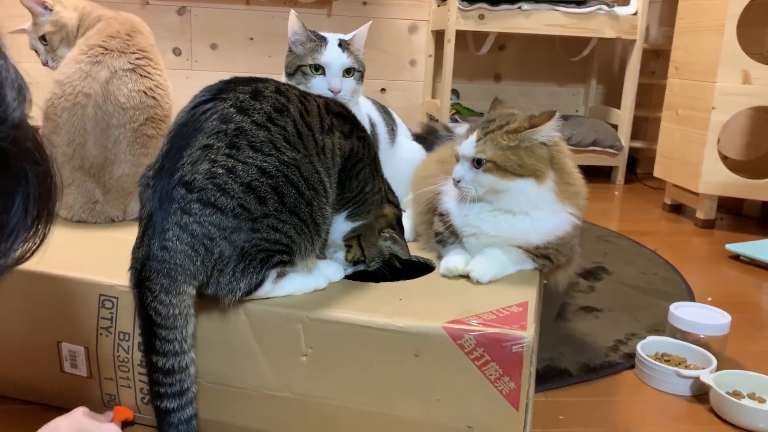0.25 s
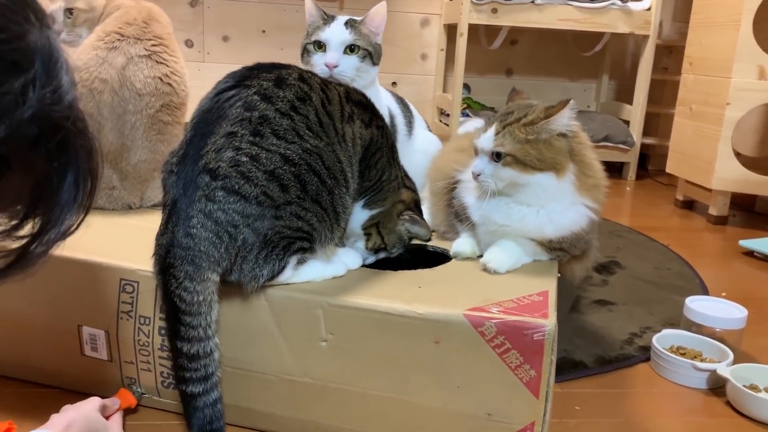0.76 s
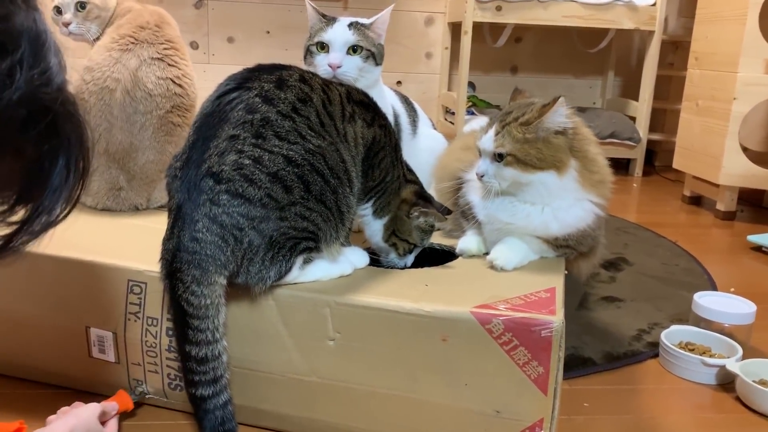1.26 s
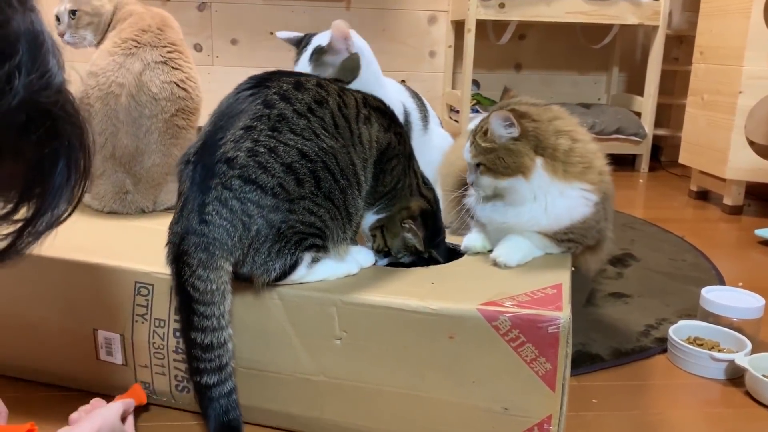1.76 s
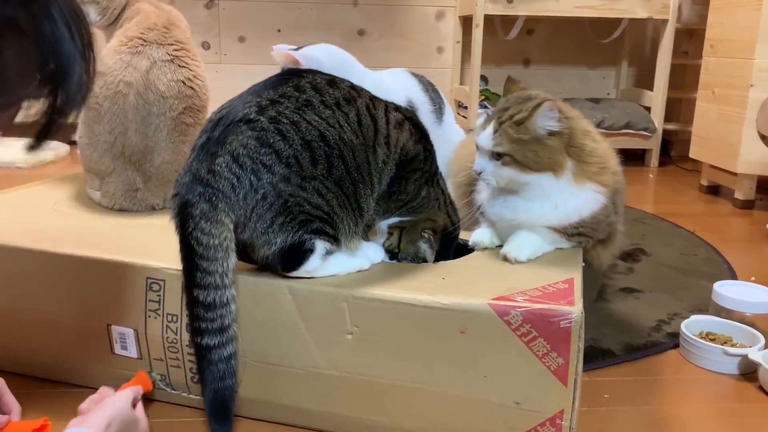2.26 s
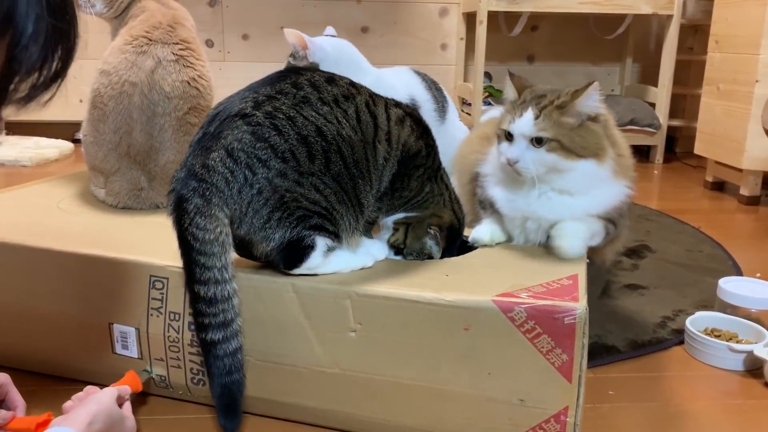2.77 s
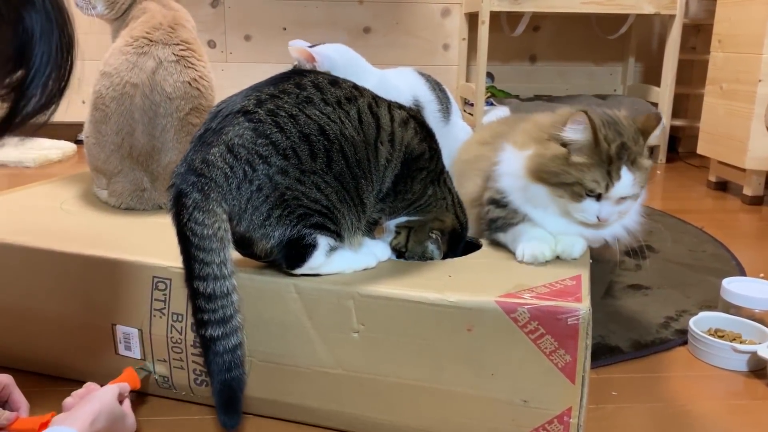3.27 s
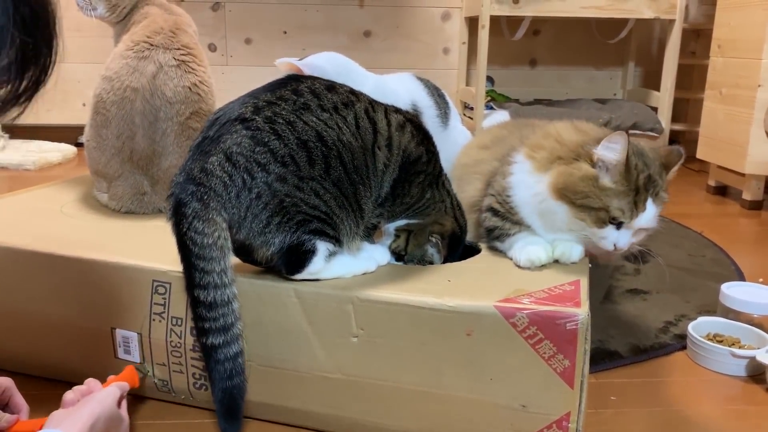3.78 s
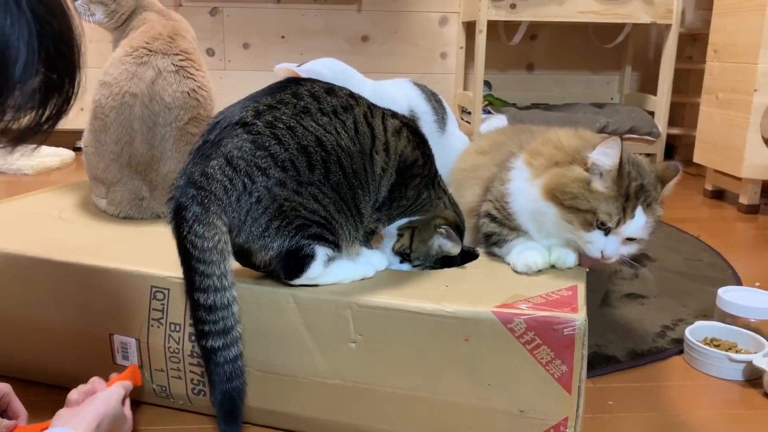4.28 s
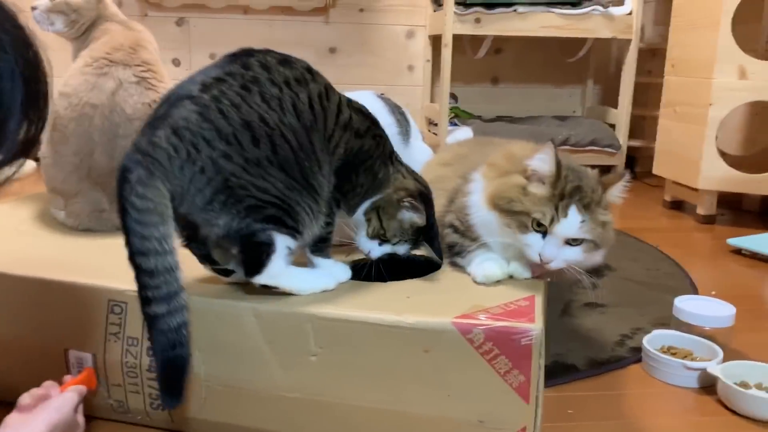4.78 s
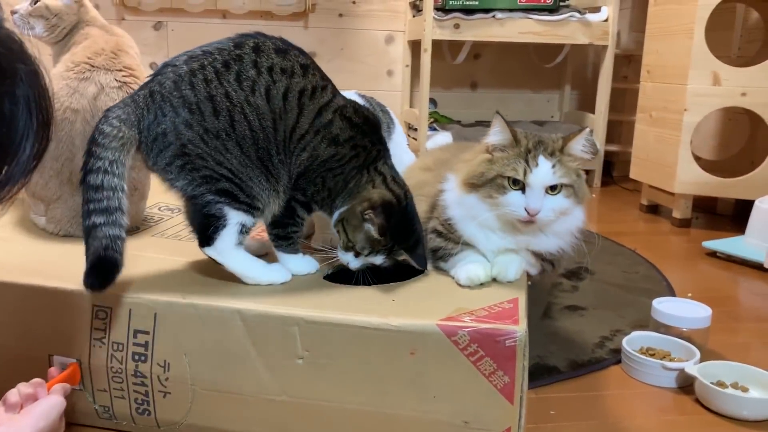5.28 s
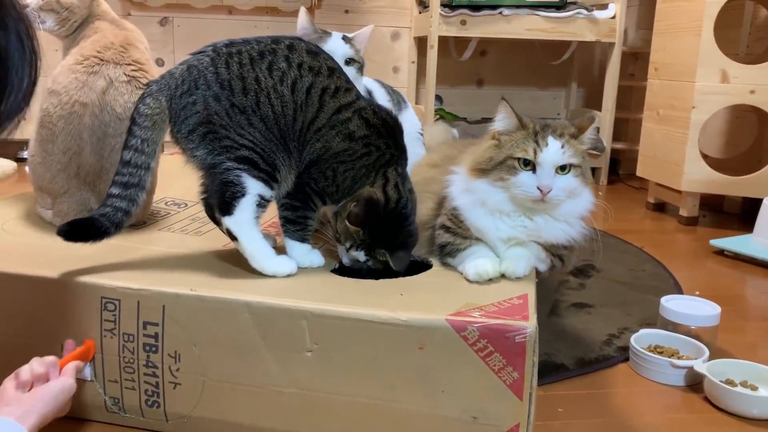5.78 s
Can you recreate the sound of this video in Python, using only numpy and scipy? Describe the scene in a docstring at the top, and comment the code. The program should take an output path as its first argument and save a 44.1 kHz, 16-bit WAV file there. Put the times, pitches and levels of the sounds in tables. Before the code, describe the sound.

A hand works a stick toy against the inside wall of a large cardboard box, several strokes a second. Each stroke gives a hollow drumming scrape, a short buzz over the corrugations, knocks and dry ticks, with low thuds from the flexing panel and a faint tuft hiss. A brief lull comes near one second, then strokes continue to the end. Close stereo microphone, small wooden room, cats silent.

```python
"""A small wooden room, two microphone ports close to a big cardboard box: a hand jerks a stick toy through its hole.
Each stroke drags the end along the inner wall. Slips and corrugations drum the wall's resonances, snags knock it,
shoves boom the panel in two decaying modes; filtered friction noise makes the card rasp and the tuft hiss.
Drumming and rasp reach the left port first, the hiss the right one; the room answers in decaying noise tails."""
import sys
import numpy as np
from scipy import signal
from scipy.fft import rfft, irfft, next_fast_len
from scipy.io import wavfile
from scipy.ndimage import uniform_filter1d

SR = 44100
rng = np.random.default_rng(int(sys.argv[2]) if len(sys.argv) > 2 else 0)


def attenuation_scalar(level_db):
    """Turn a level in dB into a linear amplitude multiplier (20 dB per decade)."""
    decades = np.asarray(level_db, float) / 20
    return 10 ** decades


def file_out(sig):
    """Save sig as 16-bit WAV at sys.argv[1]."""
    # one column per channel
    cols = np.atleast_2d(sig).T
    # limit, then scale
    lim = np.clip(cols, -1, 1)
    pcm = np.round(lim * 32767).astype(np.int16)
    wavfile.write(sys.argv[1], SR, pcm)


N = 266364
STEPS = np.arange(0, N / SR + .004, .001)  # control times [s]


def unit(x):
    """Scaled to rms 1."""
    return x / np.sqrt(np.mean(x ** 2) + 1e-20)


def along(points, hz):
    """Reads (frequency [Hz], value) points on a log frequency axis."""
    f, v = np.transpose(points)
    return np.interp(np.log(hz + 1), np.log(f + 1), v)


def curves(rows):
    """One value per sample for each column after the time."""
    s, *columns = np.transpose(rows)
    return [np.interp(np.arange(N) / SR, s, column) for column in columns]


def per_sample(*controls):
    """Controls given each millisecond, as one value per sample."""
    return curves(np.transpose([STEPS, *controls]))


def filtered(x, response):
    """x times a complex response of frequency."""
    m = next_fast_len(N + SR // 2)
    return irfft(rfft(x, m) * response(np.fft.rfftfreq(m, 1 / SR)), m)[..., :N]


def resonances(modes):
    """Sum of damped modes (Hz, width Hz, dB) in alternating sign, scaled to an rms gain of 1."""
    def response(f):
        h = 0
        for k, (centre, width, db) in enumerate(modes):
            damping = 1j * f * width
            h = h + (-1) ** k * attenuation_scalar(db) * damping / (centre ** 2 - f ** 2 + damping)
        return h / np.sqrt(np.sum(abs(h) ** 2) / len(f))
    return response


def impulses(s, db):
    """One spike per event."""
    return np.bincount(np.round(s * SR).astype(int), attenuation_scalar(db), N)[:N]


def flutter(samples):
    """Random wavering of rms 1, smoothed twice over so many samples."""
    once = uniform_filter1d(rng.standard_normal(N), int(samples))
    return unit(uniform_filter1d(once, int(samples)))


def patchy(x, depth_db):
    """Uneven fibres: random patches of gain over time and frequency."""
    z = signal.stft(x, nperseg=256)[2]
    field = uniform_filter1d(rng.standard_normal(z.shape), size=7, axis=0)
    field = uniform_filter1d(field, size=12, axis=1)
    return signal.istft(z * attenuation_scalar(depth_db * unit(field)), nperseg=256)[1][:N]


def slips(per_s, spread_db, smooth):
    """Stick-slip force of rms 1: random slips of uneven size over a share of smooth rubbing."""
    chance, size, noise = rng.random(N), rng.standard_normal(N), rng.standard_normal(N)
    jerks = unit((chance < per_s / SR) * attenuation_scalar(spread_db * size) * np.sign(noise))
    return unit(jerks + smooth * rng.standard_normal(N))


def ports(x, left_lag_s, lean=((1000, 0),)):
    """One source at both microphone ports, with a delay and a level lean (left minus right) between them."""
    side = np.array([[.5], [-.5]])
    return filtered(x, lambda hz: attenuation_scalar(side * along(lean, hz)) * np.exp(-2j * np.pi * hz * side * left_lag_s))


# gain that shapes noise into the air of the quiet room: (frequency [Hz], relative gain [dB])
AIR_SPECTRUM = [(25, -52), (55, 19.5), (130, 6), (300, -1), (700, -10), (2400, -72), (8000, -82),
                (15600, -54)]


def air():
    """The quiet room: one shared rumble and a little noise of each port's own."""
    noise = rng.standard_normal((3, N))
    both_ports = noise[0] + 0.089 * noise[1:]
    return attenuation_scalar(-47) * unit(filtered(both_ports, lambda hz: attenuation_scalar(along(AIR_SPECTRUM, hz))))


# how fast the small wooden room dies away: (frequency [Hz], 60 dB decay time [s])
ROOM_DECAY = [(100, 0.53), (1000, 0.24), (6000, 0.21), (15000, 0.2)]


def room(x):
    """Each frequency of the answer dies at its own speed; a new noise tail every quarter second."""
    out, step = np.zeros((2, N + 2 * SR)), SR // 4
    delay = 200  # samples before the answer
    for at in range(0, N, step):
        hz, t, z = signal.stft(rng.standard_normal((2, SR // 2)), SR, nperseg=256)
        decay = attenuation_scalar(-60 * t / along(ROOM_DECAY, hz)[:, None])
        tail = signal.istft(z * decay, SR, nperseg=256)[1]
        wet = signal.fftconvolve(x[None, at:at + step], tail / np.linalg.norm(tail[0]), axes=1)
        out[:, at + delay:at + delay + wet.shape[1]] += wet
    return out[:, :N]


# strokes of the toy on the wall, levels before each source's own gain:
# (full contact [s], rise [s], hold [s], drumming [dB], brightness [dB], friction hiss [dB])
STROKE_ROWS = [(0, .02, 0, -13.5, -3.5, -40.5), (0.085, 0.033, 0.05, -18, -1, -36),
               (0.202, 0.022, 0.037, -19, -0.5, -34), (0.368, 0.054, 0.01, -12.5, -1.5, -34.5),
               (0.463, .022, 0.043, -20, -6, -39), (.624, 0.055, 0.042, -20.5, -7, -46),
               (0.781, 0.016, 0.025, -26, -4.5, -47.5), (1.052, 0.028, 0.044, -30.5, -4, -50.5),
               (1.229, 0.017, 0.055, -23, 0.5, -62), (1.28, 0.066, 0.019, -19, -3.5, -39),
               (1.391, 0.032, 0.046, -18.5, -2.5, -41.5), (1.58, 0.077, 0.0098, -16.5, -7.5, -41.5),
               (1.688, 0.011, 0.03, -16, -2.5, -40), (1.843, 0.044, 0.031, -20.5, -7.5, -43.5),
               (1.988, 0.026, 0.0036, -16.5, -2, -37), (2.158, 0.049, .045, -15.5, -3.5, -36),
               (2.3, .035, 0.043, -16, -4, -36), (2.436, .05, .05, -38.5, -2.5, -53),
               (2.533, 0.051, 0.035, -17.5, -13.5, -43), (2.716, .015, 0.12, -23, -9.5, -45.5),
               (3.011, 0.0084, 0.091, -20.5, -11, -43.5), (3.249, 0.052, 0.053, -15, -8.5, -35),
               (3.457, 0.017, .05, -24, -11.5, -45.5), (3.534, .1, 0.043, -17, -13.5, -41),
               (3.79, .045, 0.03, -16, -7.5, -36.5), (4.029, 0.011, 0.0258, -26.5, 2, -33),
               (4.07, 0.038, 0.021, -11.5, -13.5, -31.5), (4.352, 0.044, 0.048, -19.5, -1, -32.5),
               (4.566, .017, 0.014, -21.5, -7, -40.5), (4.594, 0.033, 0.054, -13.5, -3.5, -30),
               (4.874, 0.035, 0.043, -14, -10.5, -40), (5.125, 0.011, .03, -14, -14, -36),
               (5.18, .03, 0.017, -11.5, -13.5, -33.5), (5.438, 0.043, 0.06, -14.5, -13, -36),
               (5.69, .012, .02, -14, -6.5, -37.5), (5.723, 0.039, 0.028, -16.5, -10, -35),
               (5.979, .03, .02, -30.5, -14.5, -51), (6.03, 0.04, 0.026, -13, -15, -37.5)]


def stroke_controls():
    """Drumming, brightness and hiss in dB: strokes rise, hold and fall; the strongest sets the brightness."""
    rise_db, hiss_rise_db, bend = 21.5, 17, 0.98  # climb over one rise time, and its exponent
    drum_fall, settle_fall = 348, 120  # dB per s: first fall, then a slower end
    hiss_fall, rustle_fall = 476, 117  # dB per s: a faint rustle outlasts the hiss
    settle_under_db, rustle_under_db = 16.5, 16
    drum_rest_db, hiss_rest_db = -55, -66.5  # the toy lying still against the card
    s, rise_s, hold_s, drum_db, bright_db, hiss_db = np.transpose(STROKE_ROWS)[:, :, None]
    early = (np.maximum(s - STEPS, 0) / np.maximum(rise_s, .003)) ** bend
    late = np.maximum(STEPS - s - hold_s, 0)
    drum_drop = np.minimum(drum_fall * late, settle_under_db + settle_fall * late)
    hiss_drop = np.minimum(hiss_fall * late, rustle_under_db + rustle_fall * late)
    drum = drum_db - rise_db * early - drum_drop
    hiss = hiss_db - hiss_rise_db * early - hiss_drop
    bright = uniform_filter1d(bright_db[drum.argmax(axis=0), 0], size=9)
    return per_sample(np.maximum(drum.max(axis=0), drum_rest_db), bright,
                      np.maximum(hiss.max(axis=0), hiss_rest_db))


# where and how the toy touches, offsets before each source's own gain:
# (time [s], high frequency reached best [Hz], tuft offset [dB], dull scrape offset [dB])
CONTACT_ROWS = [(0, 736, 0.5, 4.5), (.9, 690, 4.5, 8), (1.3, 820, 1, 7), (1.7, 734, 3.5, 8.5),
                (2.3, 780, 1.5, 5.5), (2.8, 684, -1, -5), (3.3, 770.4, -1.5, -1), (3.6, 721.2, 1, 4),
                (4.05, 900, -5, -2.5), (4.4, 1010, -5.5, -0.5), (4.65, 1250, -3.5, -1.5), (4.9, 920, 3, 6),
                (5.2, 1020, -0.5, 5), (5.5, 884.3, -2.5, 0.5), (5.75, 809, 1.5, 6.5), (6.04, 777, -1, 2)]


def contact():
    """The place and manner of contact glide from row to row: favoured Hz, tuft dB, scrape dB."""
    return curves(CONTACT_ROWS)


# shoves that flex the whole panel: (time [s], relative level [dB], relative second mode level [dB])
SHOVE_ROWS = [(0.102, -15.5, -13), (0.259, -16, -3), (0.448, -22, -15), (0.663, -21, -1),
              (1.087, -15, -2.5), (1.428, -15, -20), (1.588, -18.5, -21), (1.7, -17, 6.5),
              (1.848, -22, 1.5), (2.003, -15.5, -5), (2.166, -22, 3), (2.3, -16.5, -17), (2.375, -28.5, 10),
              (2.535, -20.5, 8), (2.751, -18.5, 10.5), (2.822, -21.5, 6), (3.03, -23, -6),
              (3.121, -25.5, 10.5), (3.321, -31, 9), (3.448, -30.5, 5), (3.577, -13, -3.5),
              (3.812, -25, 11), (4.036, -13.5, 4), (4.116, -21, 12), (4.358, -29, 8), (4.571, -20.5, -16),
              (4.879, -17.5, -4), (5.158, -18, 13.5), (5.449, -15, -20.5), (5.746, -16, 9)]
# the two bending modes of the panel: (frequency [Hz], 60 dB decay time [s])
PANEL_MODES = [(57, 0.46), (125, 0.24)]


def panel():
    """Each shove bends the panel softly and it booms on in two modes; rubbing keeps it stirring."""
    out, t = np.zeros(N + SR), np.arange(SR // 2) / SR
    onset = 1 - np.exp(-t / 0.0078)
    first, second = [attenuation_scalar(-60 * t / t60) * np.sin(2 * np.pi * hz * t) * onset for hz, t60 in PANEL_MODES]
    signs = rng.choice([-1, 1], len(SHOVE_ROWS))
    for (s, db, second_db), sign in zip(SHOVE_ROWS, signs):
        boom = first + attenuation_scalar(second_db - 4) * second
        out[round(s * SR):][:len(t)] += sign * attenuation_scalar(db + 0.5) * boom
    stir = attenuation_scalar(0.41 * stroke_controls()[0] - 20.5) * rng.standard_normal(N)
    return out[:N] + filtered(stir, resonances([(41.4, 10.1, -3.0), (52.5, 13.8, 5.0), (97, 45, -1.0)]))


# sharp ticks where an edge of the toy lets go: (time [s], level before tick gain and filter [dB])
TICK_ROWS = [(0.091, -18), (0.196, -22), (0.458, -31), (1.0477, -20), (1.3686, -23), (1.574, -26),
             (1.6814, -18), (1.9895, -17), (2.155, -14.5), (2.2865, -11), (2.5857, -26.5), (2.742, -17.5),
             (2.7496, -20), (2.779, -20), (3.2445, -22), (3.789, -35), (4.0253, -18.5), (4.0487, -24.5),
             (4.355, -21.5), (4.567, -26.5), (4.589, -18.5), (5.012, -35), (5.09, -37), (5.124, -20),
             (5.148, -29.5), (5.185, -15), (5.2088, -22), (5.4467, -11.5), (5.688, -15), (5.72, -26.5),
             (5.7326, -15), (5.912, -34.5), (6.0264, -29)]


def friction(offset_db, spectrum, tick_db, per_s):
    """Dense fine grains under the stroke, plus a noise crack at each tick, dying by 60 dB in 14 ms."""
    level_db = stroke_controls()[2] + offset_db + 2.47 * flutter(155)  # the grip flutters every few ms
    rub = attenuation_scalar(level_db) * patchy(slips(per_s, spread_db=5.0, smooth=1.0), depth_db=3.0)
    # every stroke but the first opens with a tick tied to its hiss level
    touches = [(at - rise_s, hiss_db + 3.5) for at, rise_s, *_, hiss_db in STROKE_ROWS[1:]]
    s, db = np.transpose(list(TICK_ROWS) + touches)
    decay = attenuation_scalar(-60 * np.arange(SR // 50) / SR / 0.014)
    cracks = signal.fftconvolve(impulses(s, db + tick_db), decay)[:N]
    return filtered(rub + cracks * rng.standard_normal(N), lambda hz: attenuation_scalar(along(spectrum, hz)))


# gain that shapes friction into tuft hiss: (frequency [Hz], relative gain [dB])
TUFT_SPECTRUM = [(5000, -10.5), (7000, -3.5), (8000, -3.5), (9000, -1), (12000, -3.5), (15600, -6)]


def tuft():
    """The tuft's fine grains hiss with the stroke."""
    return friction(contact()[1] + 8, TUFT_SPECTRUM, tick_db=-2.0, per_s=5000)


# bright rasp of the card surface: (frequency [Hz], relative gain [dB])
RASP_SPECTRUM = [(3200, -33), (4200, -2), (5000, -4.5), (5800, 0.5), (6800, -8), (8500, -53)]
# duller scrape of the stick's side: (frequency [Hz], relative gain [dB])
SCRAPE_SPECTRUM = [(1000, 6), (1900, 1), (2600, -4), (3600, -7.5), (4800, -33.5)]


def rasp():
    """The stick end grates brightly on the card, its side more dully."""
    bright = friction(5.0, RASP_SPECTRUM, tick_db=-2.0, per_s=3000)
    dull = friction(contact()[2] + 3, SCRAPE_SPECTRUM, tick_db=-3.0, per_s=1200)
    return bright + dull


# bursts of the stick end crossing the corrugations:
# (time [s], flutes crossed at top speed [per s], buzz level before gain and flutter [dB])
FLUTE_ROWS = [(0.108, 446, -16.5), (.234, 468, -16), (.365, 443, -21.5), (.402, 272, -19),
              (.501, 619, -24.5), (.656, 183, -20.5), (1.276, 269, -18), (1.396, 386, -23),
              (1.434, 127, -22), (1.579, 410, -20.5), (1.596, 286, -14.5), (1.694, 360, -15),
              (1.729, 132, -25), (1.846, 302, -24), (1.88, 303, -18), (2.012, 120, -19), (2.158, 402, -20),
              (2.198, 258, -15.5), (2.305, 350, -19), (2.336, 366, -24), (2.366, 151, -25),
              (2.555, 156, -25.5), (2.794, 114, -19.5), (2.842, 248, -26), (3.026, 197, -20),
              (3.07, 310, -25), (3.118, 145, -22), (3.225, 186, -24), (3.265, 340, -21), (3.29, 270, -14),
              (3.318, 185, -20), (3.337, 118, -19.5), (3.481, 163, -17.5), (3.522, 270, -22),
              (3.546, 337, -15), (3.6, 130, -22), (3.801, 281, -11.5), (3.865, 135, -25.5),
              (4.057, 349, -7.5), (4.093, 392, -22.5), (4.355, 427, -23.5), (4.375, 560, -22),
              (4.395, 500, -21), (4.417, 384, -18.5), (4.445, 160, -27.5), (4.596, 351, -14.5),
              (4.627, 430, -15), (4.655, 380, -20.5), (4.902, 366, -13), (4.939, 197, -17),
              (5.125, 334, -10.5), (5.152, 330, -18), (5.188, 353, -13), (5.223, 304, -23),
              (5.445, 357, -16.5), (5.5, 332, -11.5), (5.717, 387, -18.5), (5.744, 322, -14.5),
              (5.695, 330, -17), (5.769, 370, -21.5), (6.034, 337, -20.5)]


def flutes():
    """Rounded ridges under the stick buzz at a pitch that follows its speed; also returns their crests."""
    rise, fall, hold_s = 649.5, 550, 0.00802  # buzz slopes in dB per s
    speeding, slowing = 3, 3  # exponential rates per s, before and after a burst
    s, top_per_s, top_db = np.transpose(FLUTE_ROWS)[:, :, None]
    before, after = np.maximum(s - STEPS, 0), np.maximum(STEPS - s, 0)
    level = top_db - rise * before - fall * np.maximum(STEPS - s - hold_s, 0)
    arch = top_per_s * np.exp(-speeding * before - slowing * after)
    weight = attenuation_scalar(2 * (level - level.max(axis=0)))  # the speed glides from one burst to the next
    speed = np.sum(weight * arch, axis=0) / np.sum(weight, axis=0)
    per_s, buzz_db = per_sample(uniform_filter1d(speed, size=11), level.max(axis=0))
    phase = 2 * np.pi * np.cumsum(per_s * (1 + 0.0501 * flutter(148.5))) / SR
    # ridges are not quite sine-shaped
    shape = np.sin(phase) + 0.16 * np.sin(2 * phase) + 0.03 * np.sin(3 * phase)
    crests = unit(np.diff(np.floor(phase / (2 * np.pi)), prepend=0))
    limited_db = np.minimum(buzz_db, stroke_controls()[0] + 4)  # the contact limits the buzz
    return attenuation_scalar(limited_db + 2.0 + 3.05 * flutter(100)) * [shape, crests]


# snags of the stick on the card: (time [s], level before gain and resonance [dB], brightness [dB])
SNAG_ROWS = [(0.093, -5.5, 2.5), (0.105, -7, 8), (0.195, -2, -14), (0.207, -1, -19), (0.362, -4.5, 2.5),
             (0.47, -8, -15), (0.486, -6.5, -1), (0.623, -11.5, -0.5), (0.649, -0.5, -17),
             (0.779, -7.5, -9.5), (1.092, -3, -12.5), (1.218, -21, 2), (1.297, -24, -6), (1.386, -4, -10),
             (1.436, -5, -1.5), (1.573, 6.5, -8.5), (1.686, 3, -8), (1.72, -3, -6), (1.842, -5, -6),
             (1.982, 4.5, -7.5), (2.154, -7, -14), (2.285, -20, -9), (2.298, 0, -3), (2.711, -12, -20),
             (3.016, -16, -16), (3.105, 0, -34), (3.196, -12, -10.5), (3.246, 2, -12), (3.289, -13, -22),
             (3.463, -5.5, -27), (3.789, 4, -17), (4.028, -4, -5), (4.054, -3.5, -30), (4.321, -8.5, -10),
             (4.348, -15, 8), (4.567, -2.5, -17), (4.625, -7, -19.5), (4.876, 4, -15), (4.89, 0, -8.5),
             (5.124, -5, -4), (5.183, -2, -4), (5.435, 0, -17), (5.456, 4, -12), (5.493, 3.5, -29.5),
             (5.687, 4.5, -7), (5.706, -3, -3.5), (5.721, 4.5, -6), (5.739, -5, 6.5)]
# wall resonances, low group: (frequency [Hz], width [Hz], relative level [dB])
LOW_MODES = [(126.7, 25.2, 1), (201.1, 16.2, 1.5), (280.7, 18.5, 2), (355, 59.7, -0.5), (402.4, 49.2, 0),
             (492, 43.2, -3.5)]
# wall resonances, high group: (frequency [Hz], width [Hz], relative level [dB])
HIGH_MODES = [(623.5, 57.5, 0), (796, 79, -0.5), (855, 93, -0.5), (1054, 112, -3), (1410, 214, -7.5),
              (1865, 460, -13.5), (2110, 420, -5.5)]


def wall():
    """Slips and snags drive the same wall; brighter contact drives the high modes harder."""
    drum_db, bright_db = stroke_controls()[:2]
    force = slips(per_s=270, spread_db=6, smooth=0.48)
    s, db, snag_bright_db = np.transpose(SNAG_ROWS)
    low = attenuation_scalar(drum_db - 5.0) * force + impulses(s, db + 6.0)
    buzz, crests = flutes()
    high = attenuation_scalar(drum_db + bright_db - 6.5) * force
    high = high + attenuation_scalar(bright_db - 15.5) * crests  # each ridge crest taps the high modes
    high = high + impulses(s, db + snag_bright_db + 9)
    favoured_hz = contact()[0]
    out = filtered(low, resonances(LOW_MODES)) + buzz
    for k, (hz, width, mode_db) in enumerate(HIGH_MODES):
        reach = attenuation_scalar(-6.5 * np.log2(hz / favoured_hz) ** 2)  # modes far from the favoured one get less
        out = out + (-1) ** k * attenuation_scalar(mode_db) * filtered(high * reach, resonances([(hz, width, 0)]))
    return out


# left minus right port level of the drumming: (frequency [Hz], level difference [dB])
DRUM_LEAN = [(80, -2.5), (340, -0.5), (900, 5.5), (1400, 11.5), (2200, 4)]


def scene():
    """Wall and rasp lead at the left port, the tuft at the right; the room answers all three."""
    drum, grate, hiss = wall(), rasp(), tuft()
    near = ports(drum, -0.0002, DRUM_LEAN)
    near = near + ports(panel(), -0.000079, [(40, -0.82), (125, -1.2)])
    near = near + ports(grate, -0.00016) + ports(hiss, 0.0002575)
    thinned = filtered(drum, lambda hz: np.clip(hz / 900, .15, 1))  # the bass is nearly alike at both ports
    return near + room(attenuation_scalar(-9.0) * thinned + attenuation_scalar(-4.0) * grate + attenuation_scalar(-12.5) * hiss) + air()


def roll_off(x):
    """The treble ends steeply here."""
    return signal.sosfilt(signal.butter(12, 17010, fs=SR, output="sos"), x)


def record(dry):
    """Microphone side: bass cut at 36 Hz, nothing from 15750 Hz up, soft overload on the hardest knocks."""
    x = filtered(dry, lambda hz: (hz < 15750) * hz ** 2 / (hz ** 2 - 1.3j * hz * 36 - 36 ** 2))
    soft = x / (1 + abs(x) ** 6) ** (1 / 6)
    return roll_off(soft)


dry = scene()
out = record(dry)
file_out(out)
```